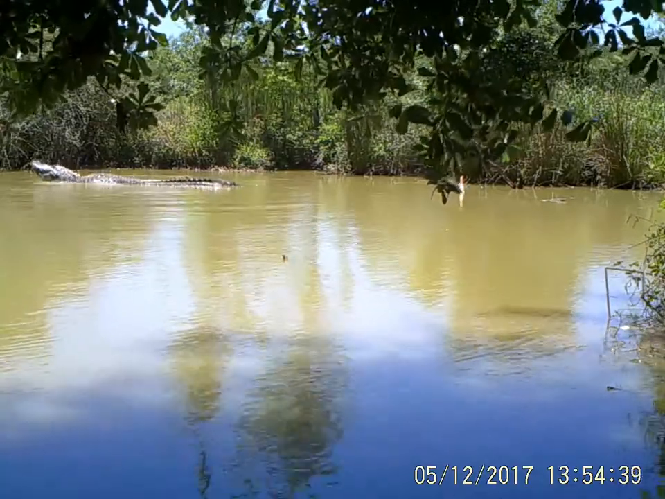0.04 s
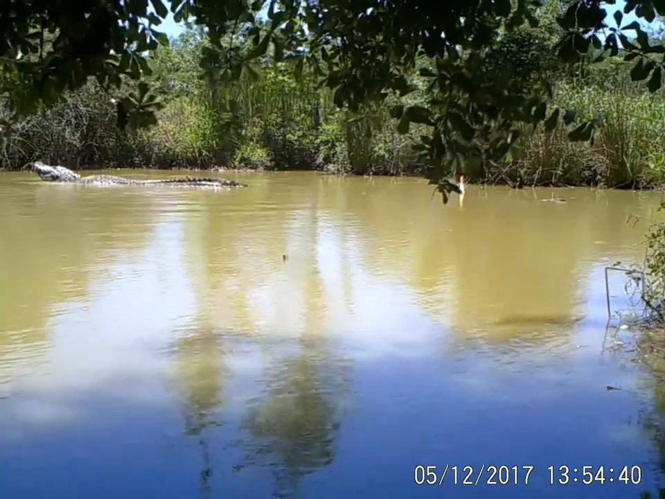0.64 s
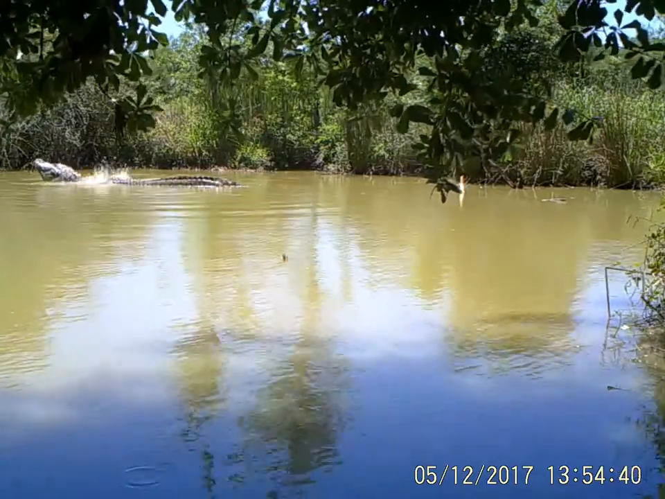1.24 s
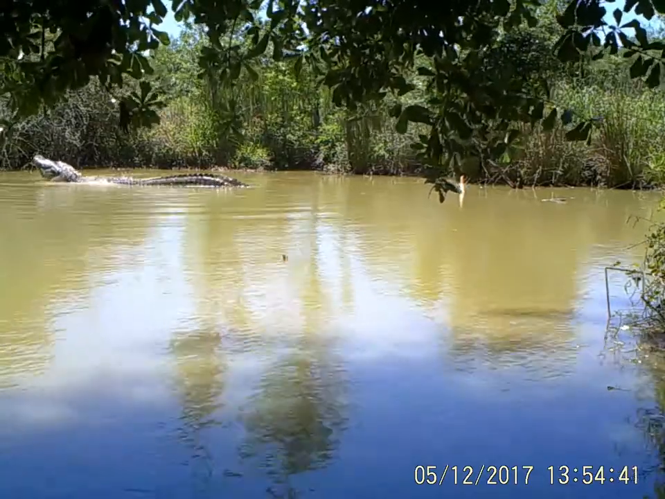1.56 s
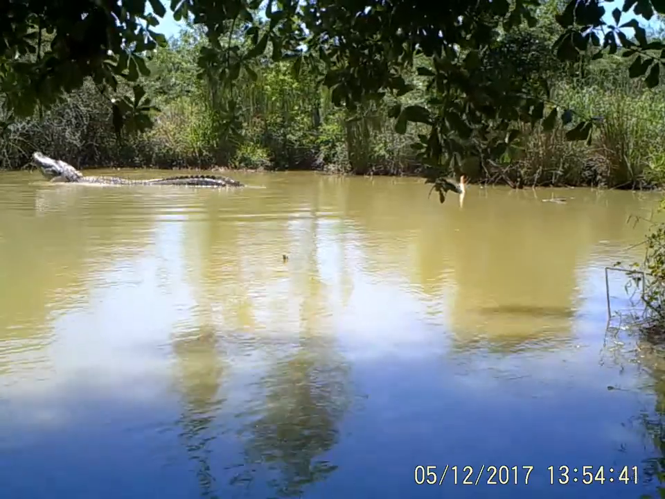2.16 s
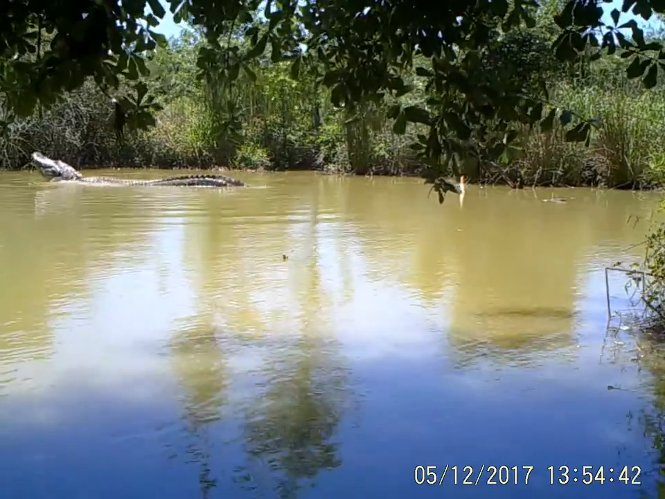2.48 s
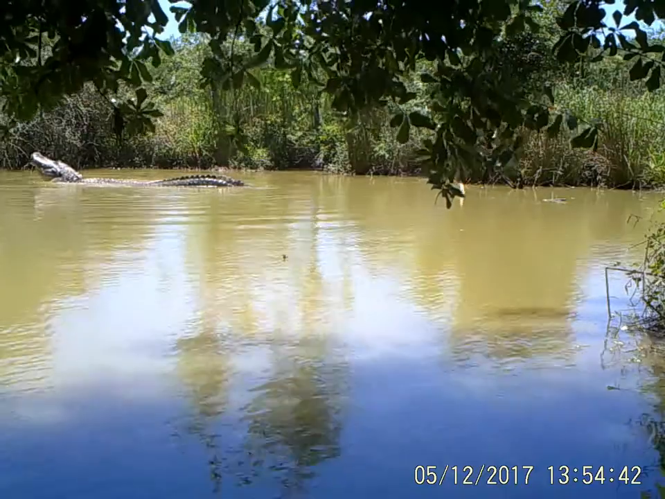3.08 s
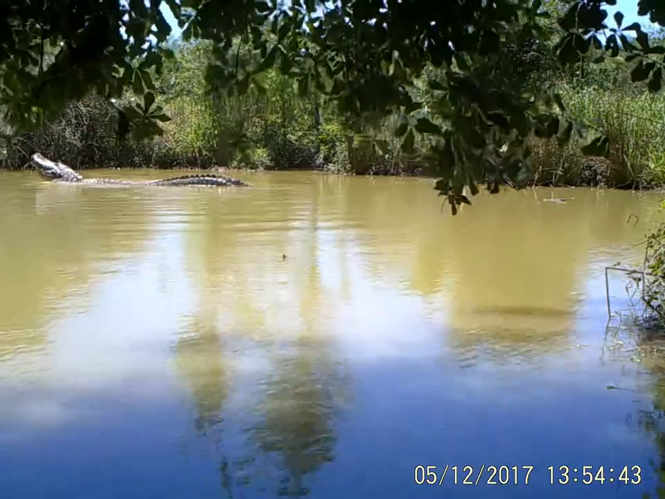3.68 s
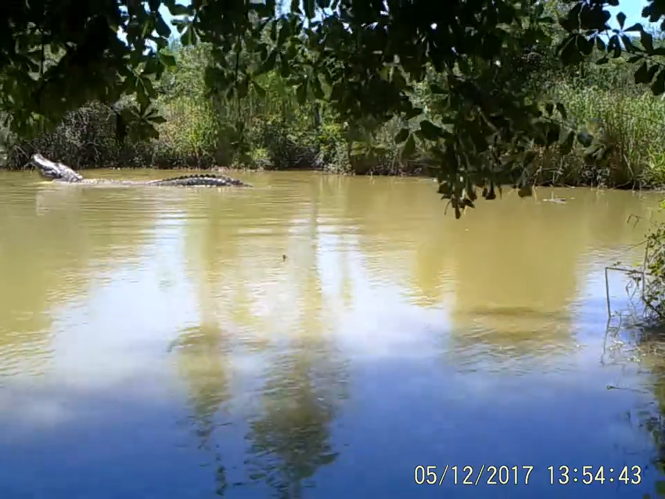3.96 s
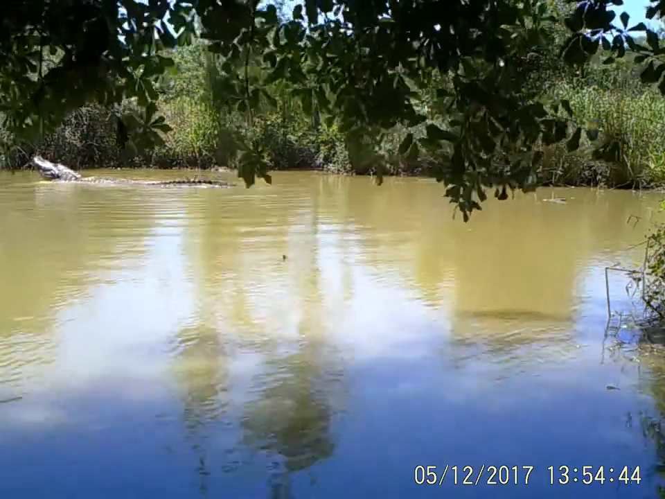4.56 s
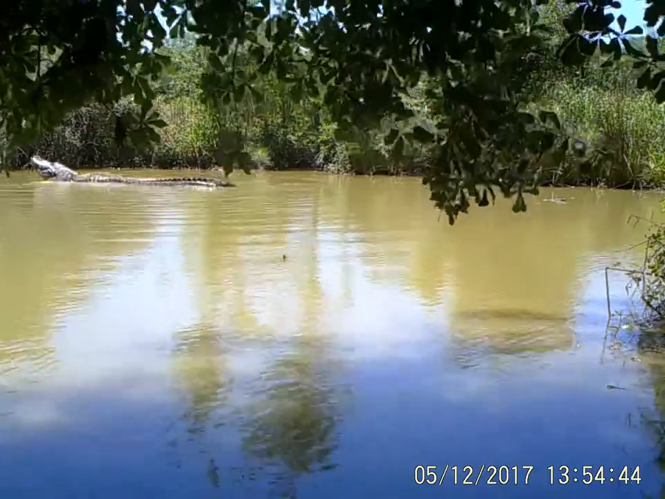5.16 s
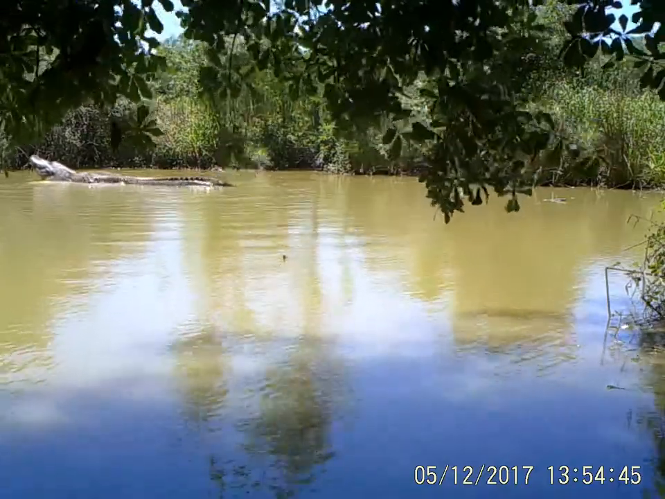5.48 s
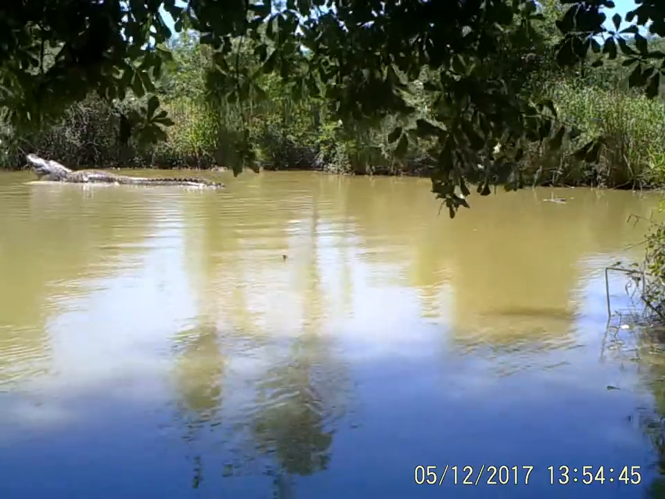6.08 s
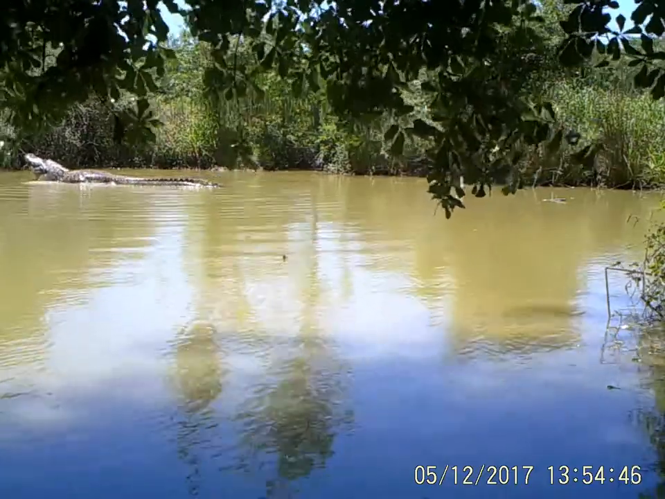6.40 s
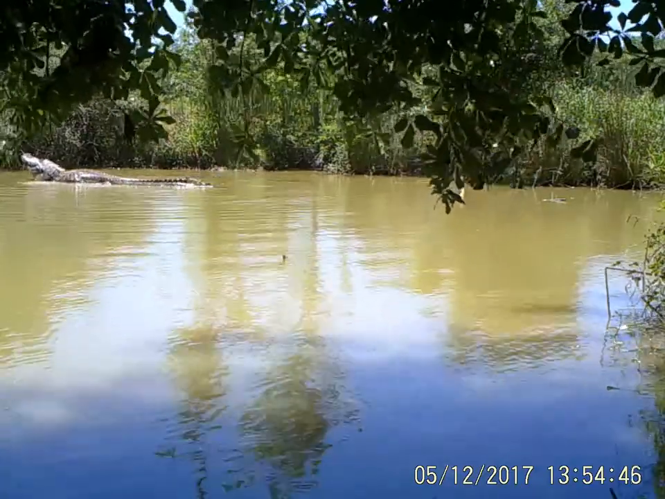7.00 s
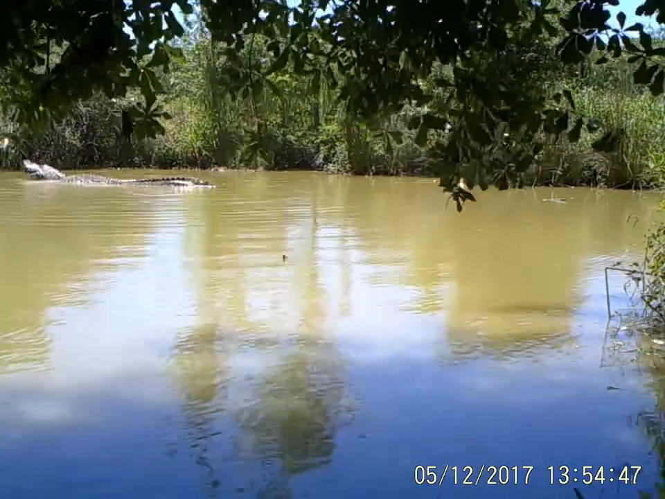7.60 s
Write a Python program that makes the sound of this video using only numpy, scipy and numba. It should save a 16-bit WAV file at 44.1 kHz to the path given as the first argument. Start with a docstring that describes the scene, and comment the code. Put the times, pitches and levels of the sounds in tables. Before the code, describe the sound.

Across a pond, an alligator gives one deep, pulsing bellow about three seconds long. Water shaken over its back spurts first, then fizzes and patters with small bubble plinks as the growl swells, slows and dies away. A few soft, low bumps follow in the quiet. A small microphone in the open air adds steady hiss and makes the water sound slightly hollow.

```python
"""Alligator across a muddy pond.

One bellow from the far side, picked up in the open air by a small camera's microphone.
Slow throat pulses ring the animal's body and shake the water over its back into spray and drops.
The camera housing makes the water sound hollow; a few soft low bumps follow, under steady hiss."""
import sys
import numpy as np
from scipy import signal
from scipy.fft import rfft, irfft
from scipy.io import wavfile
from scipy.ndimage import uniform_filter1d
from numba import njit

SR = 44100
rng = np.random.default_rng(int(sys.argv[2]) if len(sys.argv) > 2 else 0)


def unload_audio(sound):
    """Save the sound as a 16-bit wav file, at the path given as the first command line argument."""
    columns = np.transpose(np.atleast_2d(sound))
    # keep every value between -1 and 1, then stretch to whole-number steps
    steps = np.round(np.clip(columns, -1, 1) * 32767)
    wavfile.write(sys.argv[1], SR, steps.astype(np.int16))


N = 345744
TIME = np.arange(N) / SR


# throat pulses quicken into the bellow, then run down: (time [s], rate [pulses/s])
PULSE_RATE = [(1.066, 20.94), (1.386, 29.2), (1.705, 27.86), (2.015, 38.99), (2.46, 34.06), (3.067, 29.28),
              (3.215, 29.77), (3.597, 25.97), (3.783, 24.27), (4.196, 9.45)]
# the voice starts ragged, settles at its peak and frays at the end: (time [s], roughness [0-1])
ROUGHNESS = [(1.65, .42), (2.45, .17), (3.5, .19), (4.1, .28)]
def throat_pulses(scatter_db=4, jitter_s=0.002, start_phase=0.1):
    """One impulse per slap of the vocal folds, uneven in time and size when the voice is rough."""
    sounding = (TIME > PULSE_RATE[0][0]) & (TIME < PULSE_RATE[-1][0])
    phase = start_phase + np.cumsum(curve(PULSE_RATE) * sounding) / SR
    at = np.flatnonzero(np.diff(np.floor(phase)))
    timing, size = rng.standard_normal((len(at), 2)).T * curve(ROUGHNESS)[at]
    pulses = np.zeros(N)
    pulses[at + (jitter_s * SR * timing).astype(int)] = undb(scatter_db * size)
    return pulses


def bellow(pulses):
    """Pulses, each trailed by turbulent flutter, ring the throat, head and flanks."""
    flutter = .11 * curve(ROUGHNESS) * fade(pulses, .022) * noise()
    drive = pulses + flutter
    return undb(1.26) * voice(drive) + head_rasp(drive) + undb(-1) * flank_throb(drive)


# strength of the bellow from across the pond: (time [s], level [dB])
EFFORT = [(1.15, -82), (1.3, -57), (1.82, -42.5), (1.98, -45), (2.42, -37), (3.15, -41), (3.25, -47),
          (3.34, -40), (4.06, -53), (4.15, -70)]
# lowest throat resonance, high at the peak and in the last grunts: (time [s], frequency [Hz])
THROAT_HZ = [(1.9, 117), (2.3, 139), (3.55, 120), (4.05, 151.5)]
def voice(drive, mouth_hz=190, snout_hz=245, leak_db=-44):
    """The air column rings behind closed jaws; its soft walls shake and shift the resonances."""
    shake = 1 + .11 * curve(ROUGHNESS) * walk(24)
    throat = ring(drive, curve(THROAT_HZ) * shake, 22.8)
    mouth = ring(drive, mouth_hz * shake, 59.6)
    snout = ring(drive, snout_hz * shake, 50)
    column = throat - undb(-7) * mouth + undb(-12) * snout  # neighbours swing in opposite senses
    muffled = cut(column, 309, "low", order=8) + undb(leak_db) * column
    return steady(cut(muffled, 75, "high")) * swell(EFFORT)


def head_rasp(drive, full_effort_db=-36, rasp_db=-53, slope=0.61):
    """A narrow resonance of the head rasps along, fading more slowly than the voice."""
    head_hz = 324 * (1 + .022 * walk(7))
    rasp = steady(ring(ring(drive, head_hz, 30), head_hz, 66))
    slack_db = full_effort_db - curve(EFFORT)
    return rasp * undb(rasp_db - slope * slack_db)


# deep throb at the waterline, swelling ahead of the voice: (time [s], level [dB])
FLANK_LEVEL = [(1.15, -66), (1.28, -45.5), (1.47, -57), (2.0, -41), (2.95, -53), (3.97, -55.5), (4.15, -67)]
def flank_throb(drive, body_hz=30.7):
    """The flanks swing twice for every pulse, over a deep body resonance."""
    swing = ring(drive, 2 * curve(PULSE_RATE), 28)
    body = undb(-7) * ring(drive, body_hz, 8)
    return steady(cut(swing + body, 114, "low", order=4)) * swell(FLANK_LEVEL)


def water(pulses, lag_s=0.0037, dance_start_s=1.67, dance_rise_s=.25):
    """Each pulse throws up a puff of spray; more drops patter back once the water dances."""
    kicks = np.roll(pulses, int(lag_s * SR))
    puffs = steady(fade(fade(kicks, 0.0035), 0.013))
    patter = np.interp(TIME - dance_start_s, [0, dance_rise_s], [0.2, 1])
    shower = steady(puffs + patter * undb(2 * walk(45)))
    fizz, gurgles = spray(shower), gurgle(shower)
    return plinks() + fizz + undb(-14.5) * gurgles + housing(fizz + gurgles)


# water thrown up over the animal's back: (time [s], level [dB])
SPRAY_LEVEL = [(1.05, -71), (1.2, -53.5), (1.8, -54), (1.92, -47), (2.42, -46), (2.61, -49.5), (2.92, -47),
               (3.1, -51), (3.25, -50), (3.5, -54), (4.12, -63), (4.25, -75)]
# its sharpest spurts: (time [s], level [dB])
SPURTS = [(1.1174, -49), (1.2376, -46), (1.2845, -45), (1.3558, -46), (1.629, -47), (1.7774, -46),
          (1.9508, -43), (2.904, -44.5), (3.5668, -49.5)]
# colour of the spray at the microphone: (frequency [Hz], gain [dB])
SPRAY_COLOUR = [(400, -48), (800, -21), (1400, -12), (2100, -4.5), (2800, -7), (3500, 2.5), (4150, -2),
                (4800, -0.5), (6200, -7), (8000, -18.5), (11500, -18.5), (15000, -40)]
def spray(shower):
    """Falling drops ring countless tiny bubbles over a fine mist, in puffs and sharp spurts."""
    kicks = np.zeros(N)
    for start, db in SPURTS:
        kicks[int(start * SR)] = undb(db - 7)
    spurts = uniform_filter1d(fade(kicks, 0.008), size=130)
    drops = bubble_swarm(2400, 7000, cycles=16, spread_db=3.5, count=6000)
    sizzle = steady(colour(drops + 1.93 * noise(), SPRAY_COLOUR))
    height = swell(SPRAY_LEVEL)
    fizz = sizzle * np.hypot(shower * height * undb(-6), spurts)
    # the hardest shaking breaks the drops into a finer, brighter mist
    return fizz + undb(4) * height / height.max() * cut(fizz, 5500, "high", order=1)


def gurgle(shower, full_spray_db=-45.5, slope=0.95):
    """Bigger bubbles ring on between the puffs, rising and falling with the spray."""
    swarm = bubble_swarm(780, 2700, cycles=11, spread_db=2.5, count=3200)
    stirring = (swell(SPRAY_LEVEL).clip(0) / undb(full_spray_db)) ** slope
    return undb(-55) * swarm * steady(shower + 1) * stirring


# bubbles that carry clearly over the pond: (time [s], level [dB], pitch [Hz], ring time [s])
PLINKS = [(2.445, -38.5, 3040, .007), (2.465, -46, 1910, .018), (2.548, -49, 1840, 0.024),
          (2.906, -44, 1850, 0.02), (3.566, -45, 2450, 0.0057), (3.714, -52.5, 2446, .018),
          (3.835, -57, 2437, .024), (4.002, -52, 3375, .0056), (4.07, -54, 3230, 0.0048),
          (4.145, -59, 3850, 0.0077)]
def plinks():
    """Single bubbles ring out above the spray."""
    out = np.zeros(N)
    for start, db, hz, ring_s in PLINKS:
        add(out, start, undb(db) * bubble(hz, ring_s))
    return out


def bubble_swarm(low_hz, high_hz, cycles, spread_db, count):
    """Bubbles of random pitch and strength ring while the water is stirred."""
    out = np.zeros(N)
    start, end = SPRAY_LEVEL[0][0], SPRAY_LEVEL[-1][0]
    for when, pitch, faintness in rng.random((count, 3)):
        hz = low_hz * (high_hz / low_hz) ** pitch
        gain = undb(-spread_db * np.log(faintness + 0.0025))
        add(out, start + when * (end - start), gain * bubble(hz, cycles / hz))
    return steady(out)


def bubble(hz, ring_s):
    """A trapped air bubble rings down."""
    age = np.arange(int(5 * ring_s * SR)) / SR
    return np.exp(-age / ring_s) * np.sin(2 * np.pi * hz * age)


# resonances of the camera body around the microphone: (frequency [Hz], width [Hz], gain [dB])
HOUSING_MODES = [(800, 50, -9), (930, 120, -9), (1112, 35, -2), (1240, 50, 1), (1585, 60, 3), (1832, 45, 6),
                 (2420, 90, 4), (2975, 80, 0), (4405, 120, -1)]
def housing(sound):
    """The camera housing rings in narrow bands, adding a hollow colour."""
    return sum(undb(db) * ring(sound, hz, width) for hz, width, db in HOUSING_MODES)


# soft bumps in the quiet after the bellow: (time [s], level [dB], pitch [Hz], length [s])
BUMPS = [(4.511, -44, 48.6, 0.041), (6.741, -50, 57, 0.054), (7.068, -48, 71, 0.026),
         (7.351, -55, 54.4, 0.044)]
def bumps():
    """Each bump is a few cycles of dull, low pressure swing."""
    out = np.zeros(N)
    for start, db, hz, length in BUMPS:
        age = np.clip(TIME - start, 0, length)
        arch = np.sqrt(np.abs(np.sin(np.pi * age / length)))
        out += undb(db) * arch * np.sin(2 * np.pi * hz * age)
    return out


# pondside air and the microphone's own hiss: (frequency [Hz], relative level [dB])
AIR_COLOUR = [(15, -12.5), (35, -12.5), (70, -12.5), (150, -14), (250, -18), (400, -20.5), (800, -23.5),
              (1600, -26.5), (3500, -29.5), (5200, -29), (7000, -32), (10000, -32.5), (15000, -32.5),
              (17000, -37.5)]
def air(level_db=-55.5):
    """Steady hiss; the low outdoor rumble wanders a little."""
    hiss = colour(noise(), AIR_COLOUR)
    hiss /= np.sqrt(np.mean(hiss ** 2))
    wander = ring(hiss, 130, 150) * (undb(.8 * walk(9)) - 1)
    return undb(level_db) * (hiss + wander)


def undb(db):
    """Decibels to gain."""
    return 10 ** (np.asarray(db) / 20)


def curve(table):
    """Join (time [s], value) points with straight lines."""
    return np.interp(TIME, *np.transpose(table))


def swell(table):
    """A level curve as gain, silent outside its span."""
    inside = (TIME > table[0][0]) & (TIME < table[-1][0])
    return undb(curve(table)) * uniform_filter1d(inside * 1., size=1500)


def noise():
    """White noise."""
    return rng.standard_normal(N)


def walk(rate_hz):
    """Slow random wander with a spread near 1."""
    points = rng.standard_normal(1024)
    return np.interp(TIME * rate_hz, np.arange(len(points)), points)


def colour(x, points):
    """Shape a sound with a (frequency [Hz], gain [dB]) spectrum."""
    hz, db = np.transpose(points)
    freqs = np.maximum(np.arange(N // 2 + 1) * SR / N, 1)
    gain = undb(np.interp(np.log(freqs), np.log(hz), db))
    return irfft(rfft(x) * gain, N)


def cut(x, hz, kind, order=2):
    """Low-pass or high-pass."""
    return signal.sosfilt(signal.butter(order, hz, kind, fs=SR, output="sos"), x)


@njit
def svf(x, hz, width_hz):
    """State-variable band-pass with a moving centre, gain 1 there."""
    out, band_state, low_state = np.empty(len(x)), 0., 0.
    for i in range(len(x)):
        step, damping = np.tan(np.pi * hz[i] / SR), width_hz / hz[i]
        band = (band_state + step * (x[i] + 1e-18 - low_state)) / (1 + step * (step + damping))
        band_state = 2 * band - band_state
        low_state += 2 * step * band
        out[i] = damping * band
    return out


def ring(x, hz, width_hz):
    """One resonance, still or moving."""
    return svf(x, hz * np.ones(N), float(width_hz))


def fade(x, seconds):
    """Give every impulse an exponential tail."""
    return signal.lfilter([1], [1, -np.exp(-1 / (seconds * SR))], x + 1e-18)


def steady(x, floor=0.021):
    """Even out the slow level of a sound, keeping its throb."""
    power = uniform_filter1d(uniform_filter1d(x ** 2, size=5000), size=5000)
    return x / np.sqrt(np.abs(power) + floor * np.mean(power))


def add(out, start_s, sound):
    """Mix a sound in from a given time on."""
    at = int(start_s * SR)
    out[at:at + len(sound)] += sound[:N - at]


def scene():
    """The bellow and its spray across the quiet pond, in mono."""
    pulses = throat_pulses()
    return (bellow(pulses) + undb(1.5) * water(pulses) + bumps() + air())[None]


def record(dry, top_hz=15700, offset=.0048):
    """The camera cuts the top treble; its converter sits slightly off zero."""
    lowpass = signal.ellip(10, .2, 70, top_hz, fs=SR, output="sos")
    return signal.sosfilt(lowpass, dry) + offset


dry = scene()
out = record(dry)
unload_audio(out)
```